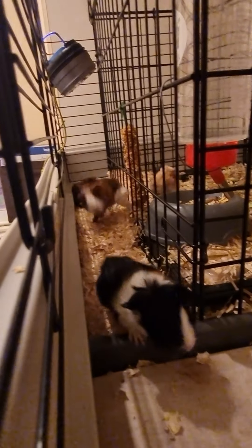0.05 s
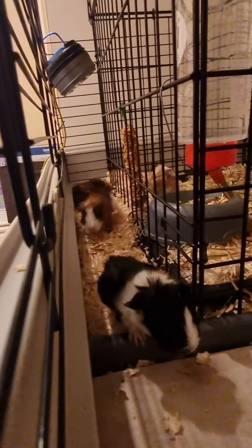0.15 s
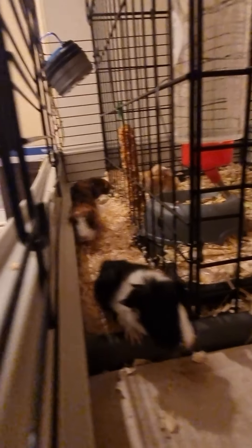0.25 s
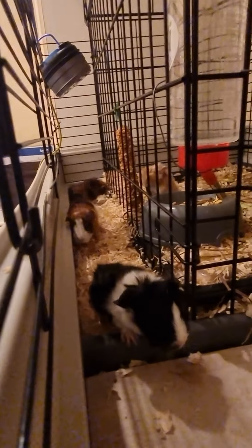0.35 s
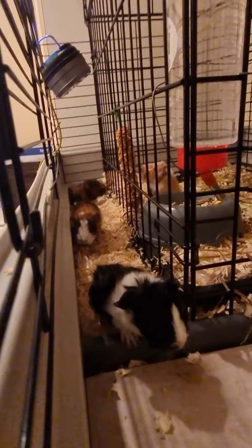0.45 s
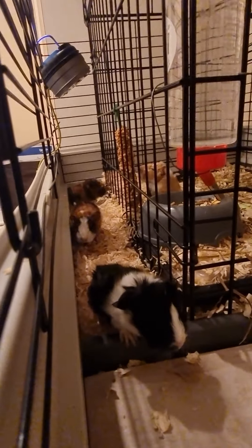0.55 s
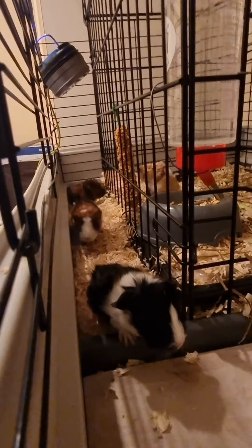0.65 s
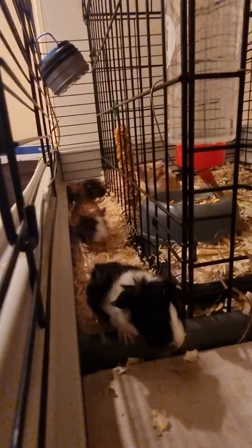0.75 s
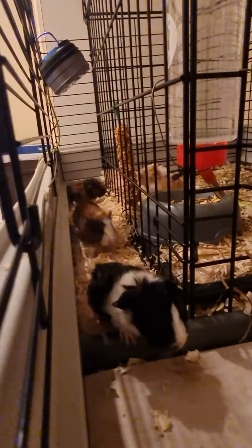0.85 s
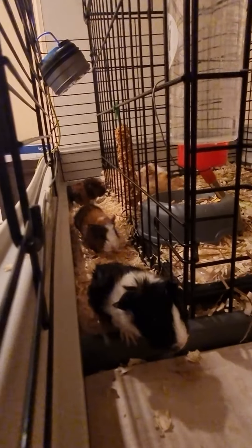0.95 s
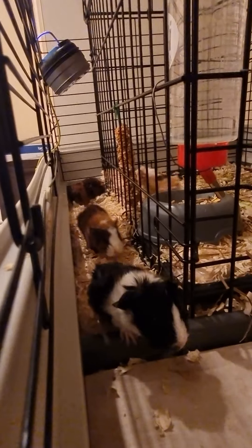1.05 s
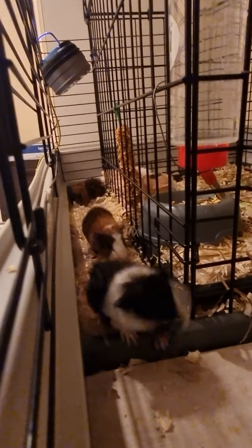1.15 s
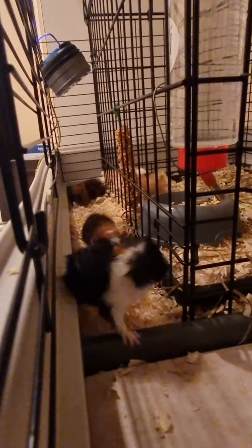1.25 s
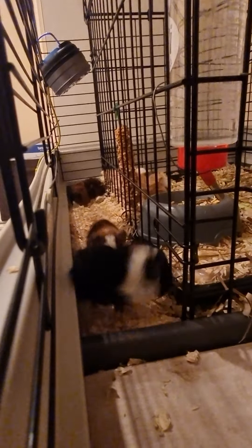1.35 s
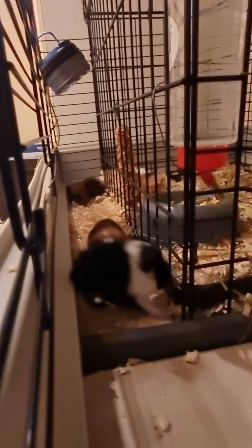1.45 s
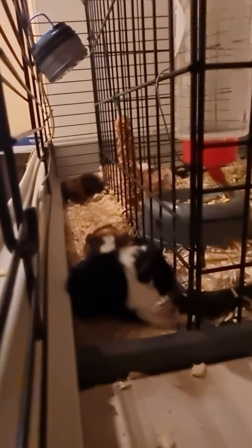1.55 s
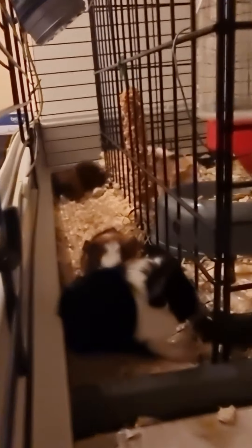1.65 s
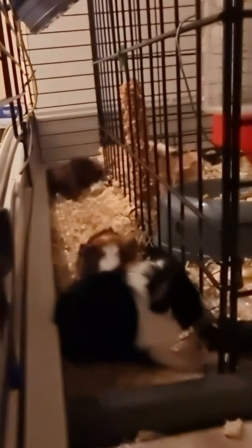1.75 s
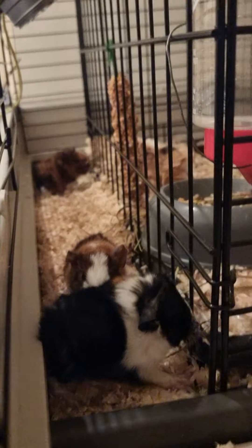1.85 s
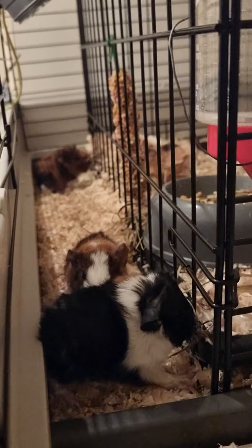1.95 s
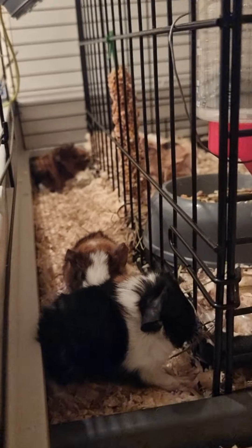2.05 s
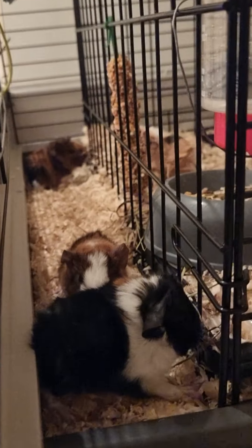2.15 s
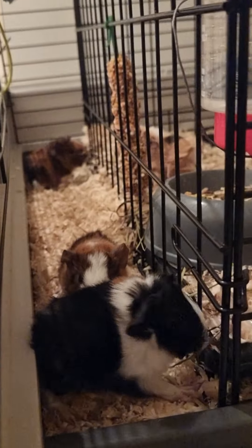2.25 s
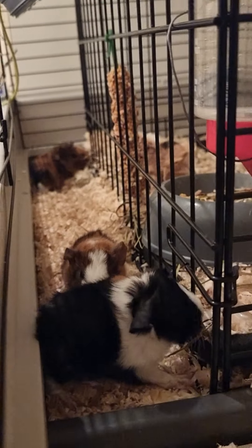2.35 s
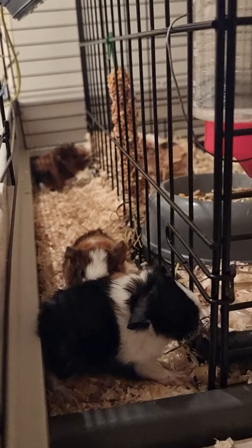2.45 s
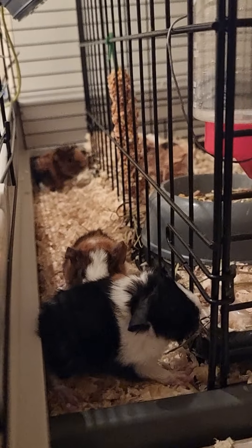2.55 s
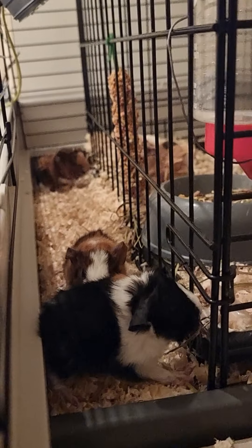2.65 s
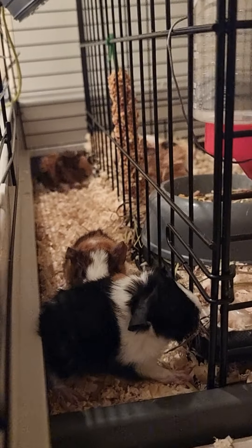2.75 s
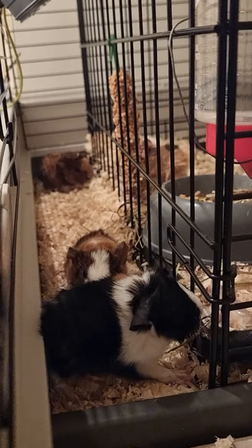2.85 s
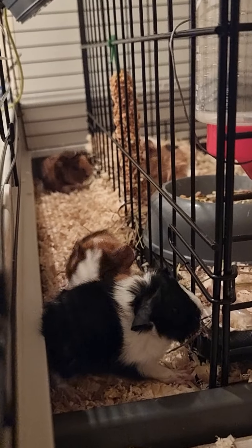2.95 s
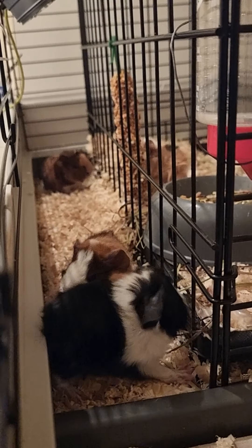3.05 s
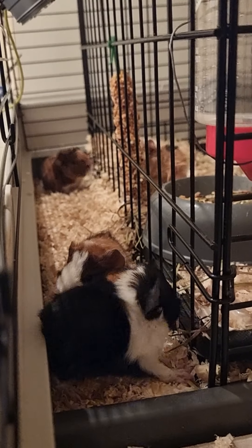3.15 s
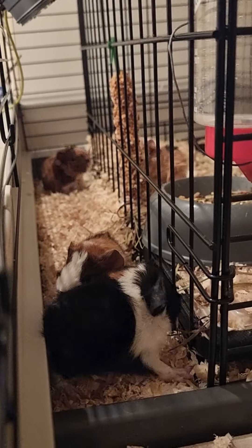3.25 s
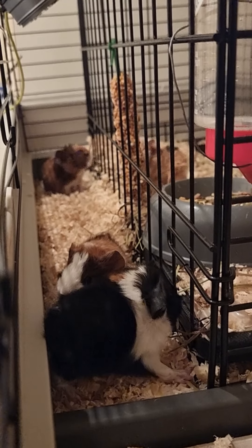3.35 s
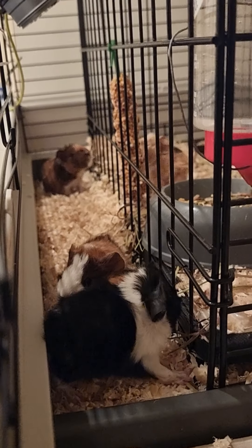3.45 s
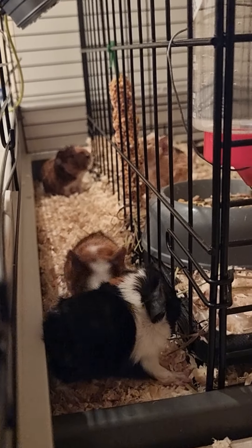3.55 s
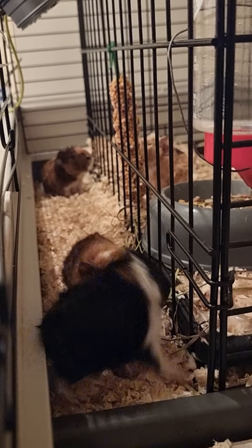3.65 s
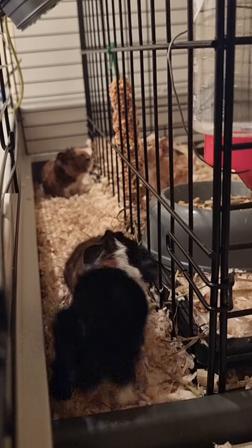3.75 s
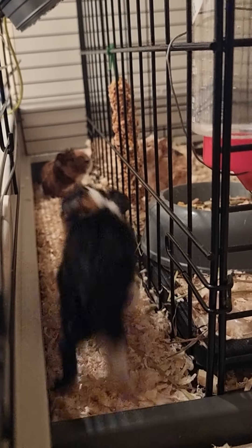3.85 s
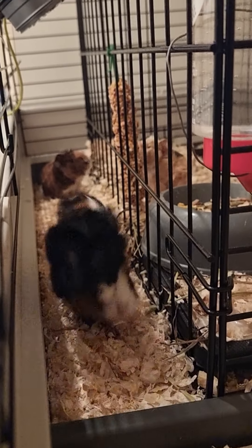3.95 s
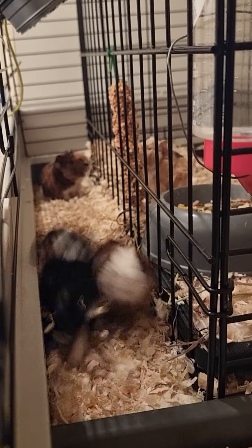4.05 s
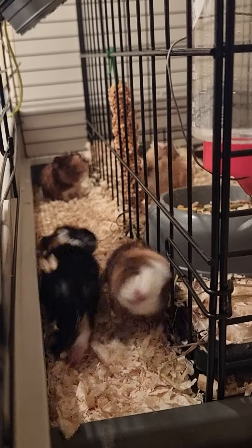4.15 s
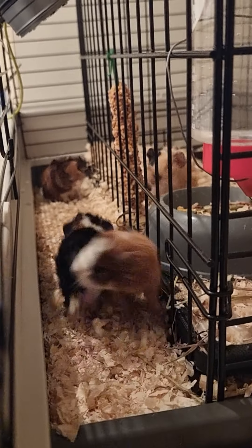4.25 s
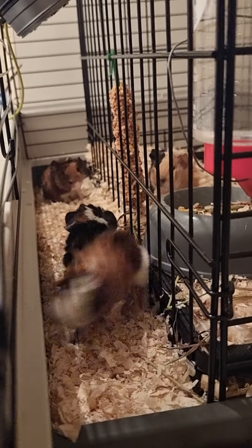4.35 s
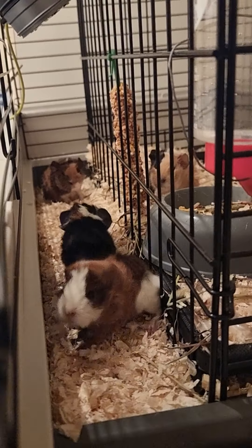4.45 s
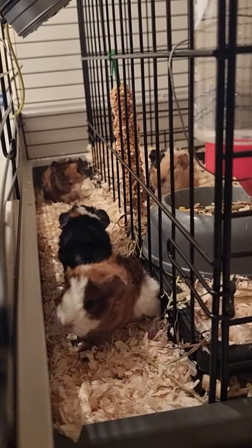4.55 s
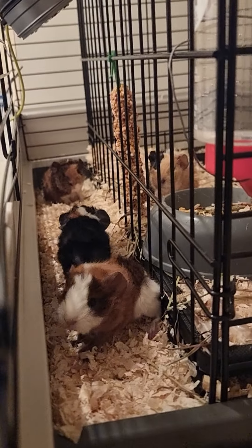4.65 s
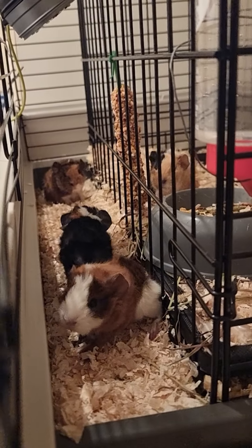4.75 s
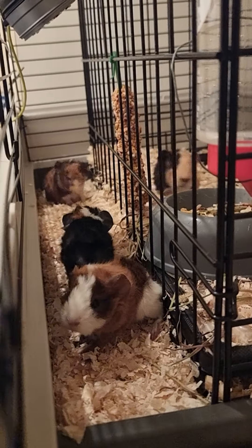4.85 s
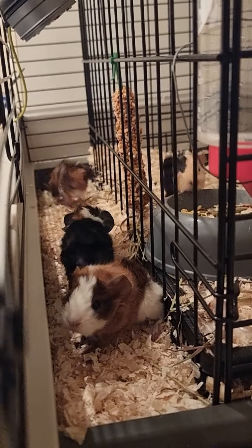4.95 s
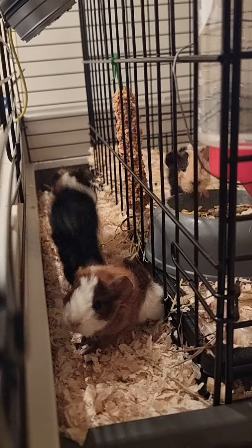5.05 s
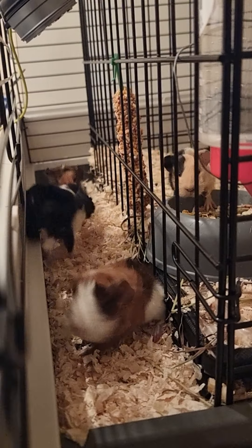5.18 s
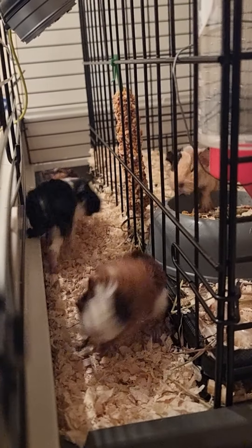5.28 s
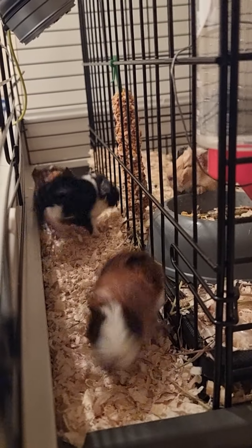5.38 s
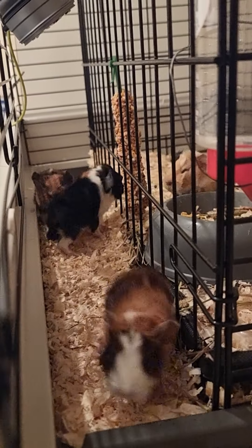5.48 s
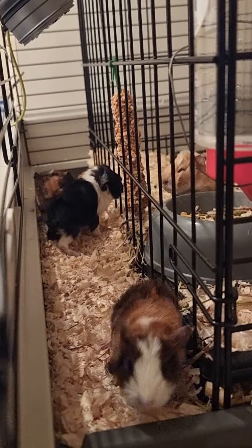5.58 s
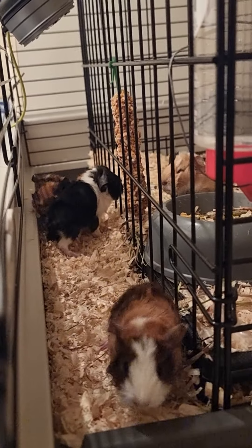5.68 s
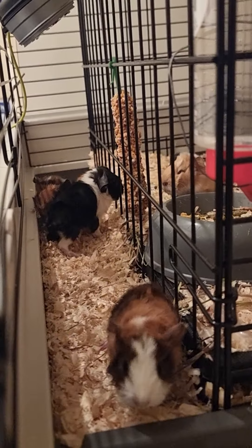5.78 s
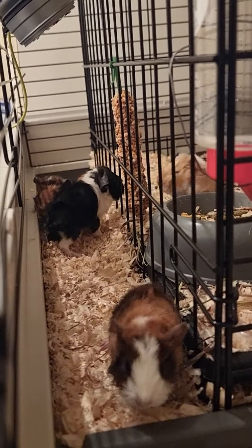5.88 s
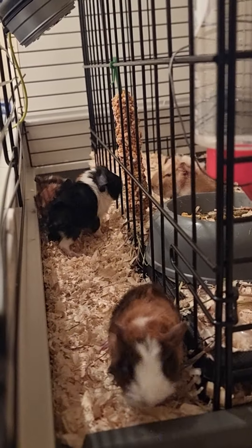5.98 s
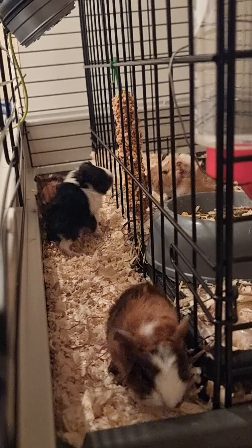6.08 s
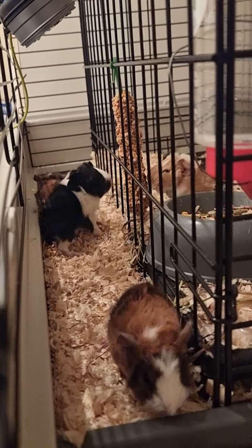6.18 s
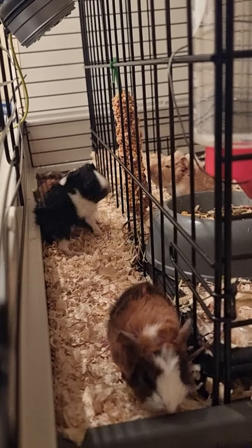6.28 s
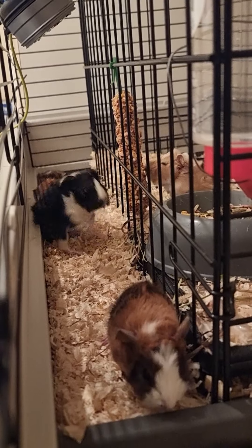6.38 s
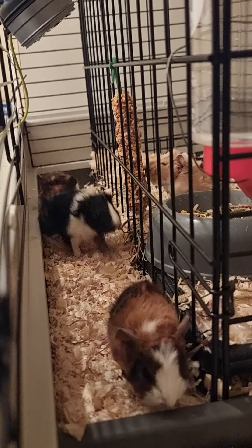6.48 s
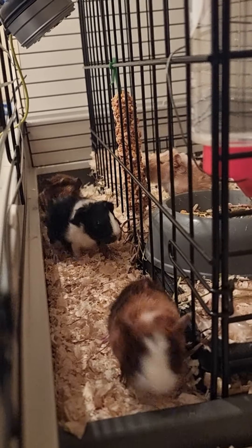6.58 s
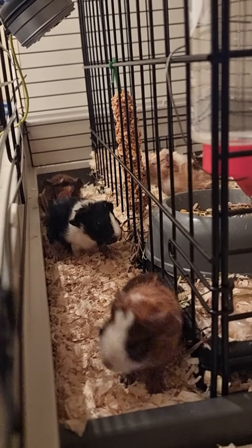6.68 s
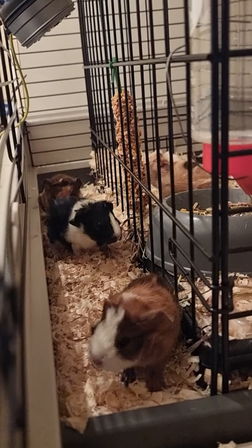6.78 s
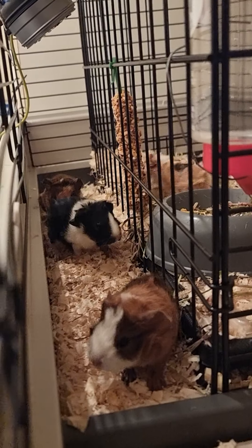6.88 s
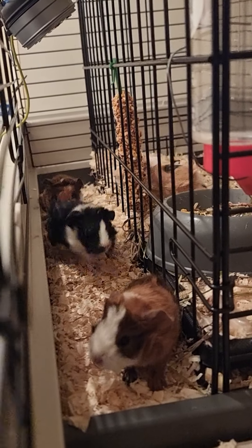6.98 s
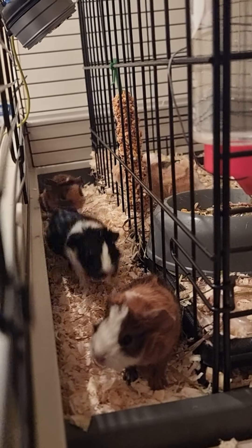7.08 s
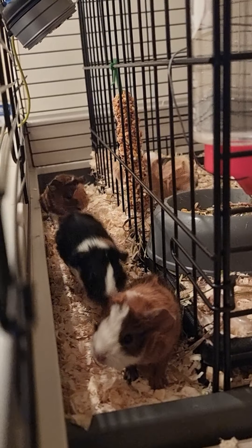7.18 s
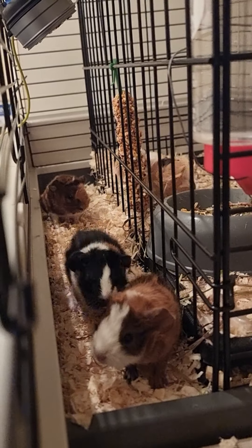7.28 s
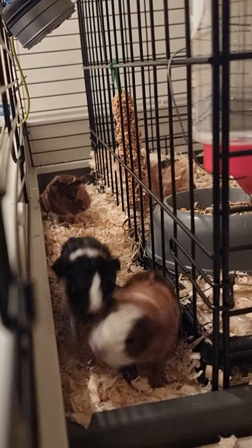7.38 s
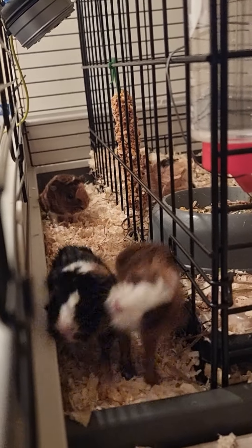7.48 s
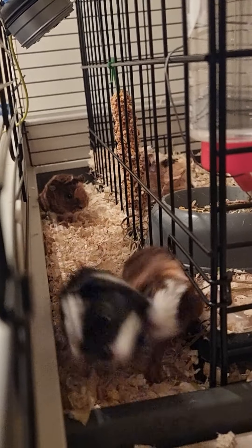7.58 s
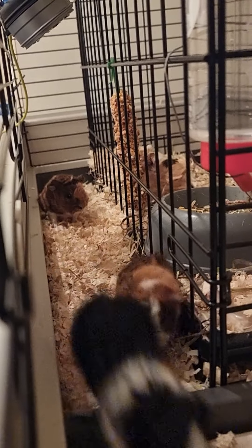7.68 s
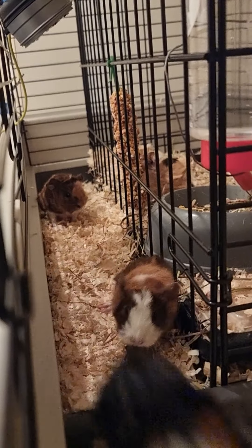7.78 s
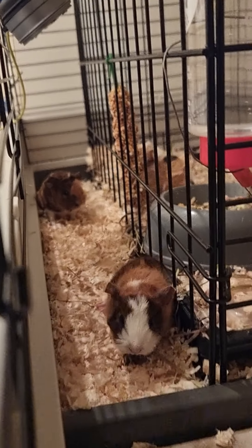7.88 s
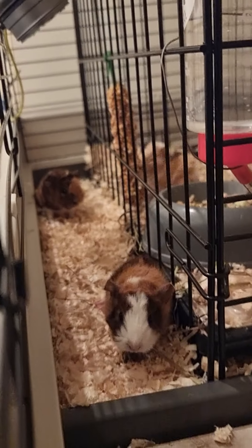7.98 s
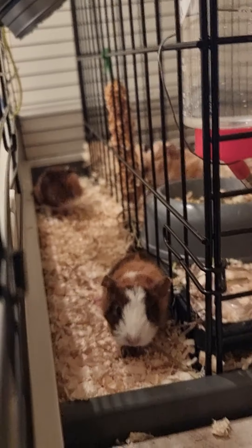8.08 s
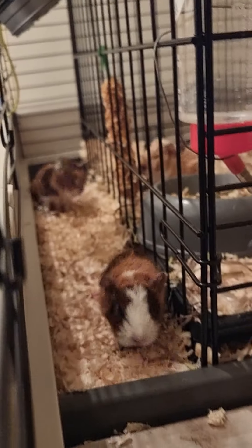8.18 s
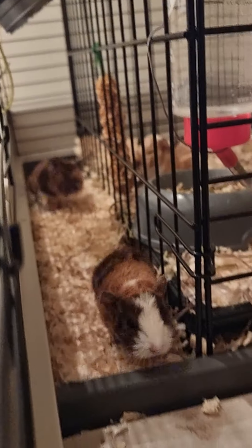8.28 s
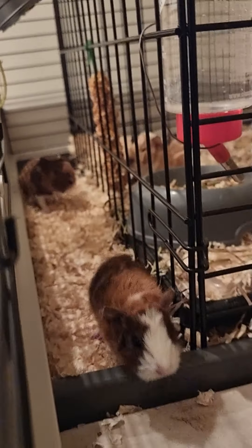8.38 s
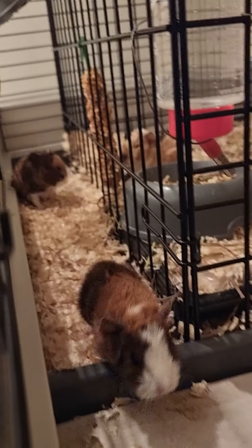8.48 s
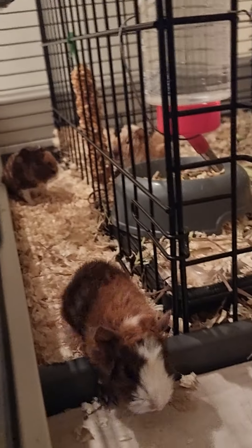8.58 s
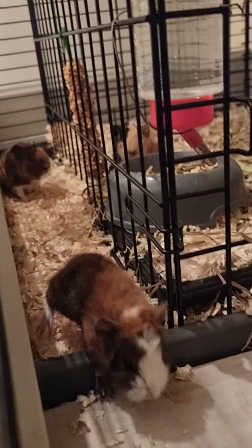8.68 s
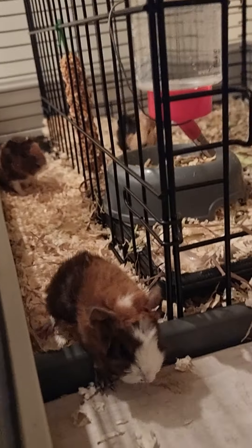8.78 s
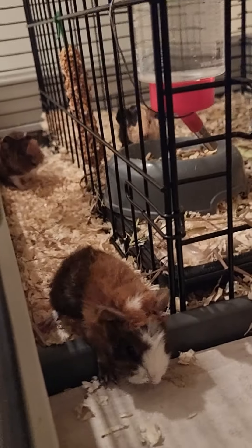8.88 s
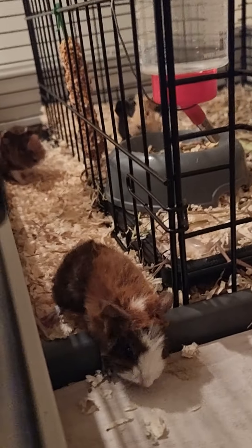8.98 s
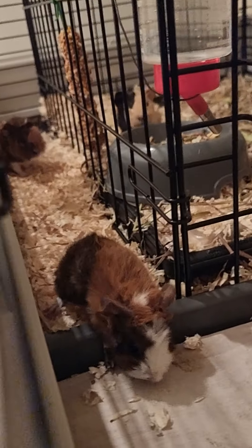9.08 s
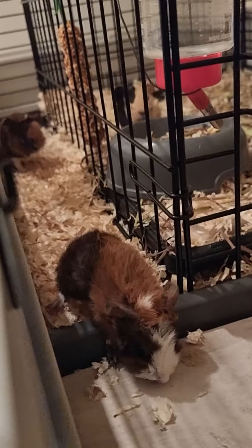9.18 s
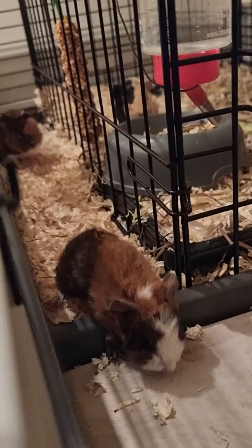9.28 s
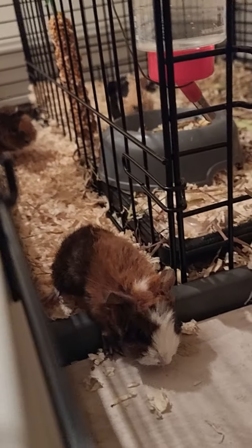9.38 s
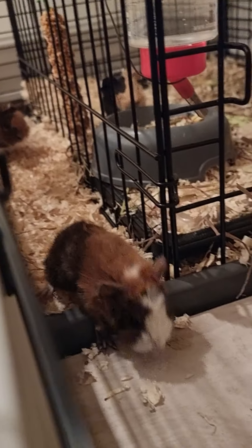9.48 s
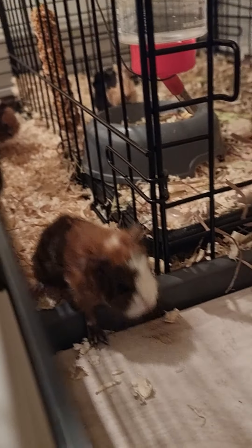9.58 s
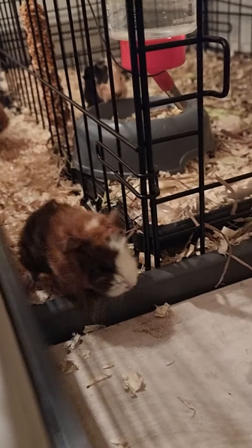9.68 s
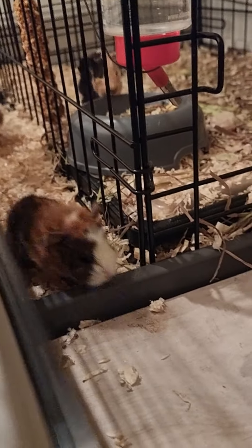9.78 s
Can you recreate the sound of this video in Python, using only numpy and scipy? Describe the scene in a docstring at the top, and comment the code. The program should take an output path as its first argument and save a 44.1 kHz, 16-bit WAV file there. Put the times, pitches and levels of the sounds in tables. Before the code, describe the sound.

Close stereo microphones catch dry wood shavings crunching under small paws, with quick throaty guinea pig chuts bubbling almost throughout. An early hard landing knocks the plastic tray, followed by a quiet pause. Two busier scuffles follow, with low hollow footfalls and sharp little clicks on wire bars, the second densest in ticks. Faint room hush and a short indoor reverberation surround everything, and it ends calmly.

```python
"""First one hears a faint room hush and the crunch of wood shavings: guinea pigs potter about a wire cage.
Shavings and hush are shaped noise; soft chuts and warbles are gliding tones with overtones, pulses and breath.
Feet set a plastic tray swinging at its low mode and tick on bars, which ring as damped modes; one body lands hard.
Two microphones close by hear it with small lags and level tilts; voices, ticks and landing excite a small room."""
import sys
import numpy as np
from scipy import signal
from scipy.fft import rfft, irfft, next_fast_len
from scipy.io import wavfile
from scipy.ndimage import uniform_filter1d, map_coordinates

SR = 44100
rng = np.random.default_rng(int(sys.argv[2]) if len(sys.argv) > 2 else 0)


def inscribe(sig):
    """Save sig as 16-bit PCM at rate SR to the path in sys.argv[1].

    A 1-D sig is mono; a 2-D sig holds one channel per row.
    Samples are clipped to [-1, 1] before scaling.
    """
    pcm = np.round(np.clip(np.atleast_2d(sig).T, -1, 1) * 32767)
    wavfile.write(sys.argv[1], SR, pcm.astype(np.int16))


N = 433503


def amp(db):
    """Decibel law: the amplitude gain of a level in dB."""
    return 10 ** (np.asarray(db) / 20)


def unit(x):
    """Normalization: x at rms 1."""
    return x / np.sqrt(np.mean(x ** 2) + 1e-20)


def along(points, hz):
    """Interpolation of (f/Hz, value) points on a logarithmic frequency axis."""
    f, v = np.transpose(points)
    return np.interp(np.log(hz + 1), np.log(f + 1), v)


def curves(rows):
    """Linear interpolation in time: one value per sample for each column after t/s."""
    s, *columns = np.transpose(rows)
    return [np.interp(np.arange(N) / SR, s, column) for column in columns]


def wobble(rate, size=N):
    """Band-limited random modulation: a smooth curve through `rate` random knots a second."""
    knots = rng.standard_normal(int(size * rate / SR) + 4)
    return map_coordinates(knots, [np.arange(size) * rate / SR])


def filtered(x, response):
    """Linear filtering: the spectrum of x times a response of frequency."""
    m = next_fast_len(N + 8192)
    return irfft(rfft(x, m) * response(np.fft.rfftfreq(m, 1 / SR)), m)[..., :N]


def bursts(peaks, levels_db, swells, fades):
    """Exponential growth and decay: summed envelopes, each rising and falling 60 dB in its swell and fade."""
    out = np.zeros(N + 3 * SR)  # starts one second early
    t = np.arange(-SR, SR) / SR
    for s, db, swell, fade in np.broadcast(peaks, levels_db, swells, fades):
        drop = np.where(t < 0, -t / max(swell, .01), t / max(fade, .03))
        out[round(s * SR):][:2 * SR] += amp(db - 60 * drop)
    return out[SR:SR + N]


# Coherence of the two microphones: f/Hz, left-right correlation [-1 to 1]
COHERENCE = [(60, 1), (150, 0.56), (300, 0.58), (700, 0.41), (1400, 0), (15000, 0)]


def grains(spectrum, spiky_db, clump_db, clump_rate, patchy_db):
    """Shot noise: stereo crackle of rms 1, in clumps of sudden onset (lulls if clump_db < 0), patchy in colour."""
    starts = (rng.random(N) < clump_rate / SR) * rng.exponential(size=N)
    clumps = unit(signal.lfilter([1], [1, -np.exp(-clump_rate / SR)], starts) - 1)
    size = amp(spiky_db * rng.standard_normal(N) + clump_db * np.clip(clumps, -2, 2.5))
    z = signal.stft(size * rng.standard_normal((2, N)), nperseg=256)[2]
    patches = uniform_filter1d(rng.standard_normal(z.shape[1:]), size=5, axis=0)  # smooth over frequency
    patches = uniform_filter1d(patches, size=7, axis=1)  # and over time
    pair = signal.istft(z * amp(patchy_db * unit(patches)), nperseg=256)[1][:, :N]

    def mid_side(hz):
        # sharing power between mid and side sets the coherence
        turn = np.arccos(np.clip(along(COHERENCE, hz), -1, 1)) / 2
        return amp(along(spectrum, hz)) * [np.cos(turn), np.sin(turn)]

    mid, side = filtered(pair, mid_side)
    return unit(np.array([mid + side, mid - side]))


def ring(modes, t, scatter_db, detune=0):
    """Modal superposition: one blow on damped modes, with random strength, phase and (if detuned) pitch."""
    out = 0
    for hz, db, t60 in modes:
        decay = amp(db + scatter_db * rng.normal() - 60 * t / t60)
        out = out + decay * np.sin(2 * np.pi * (hz * (1 + detune * rng.normal()) * t + rng.random()))
    return out


def place(out_len, events, lag_s, pan_db):
    """Interaural-style cues: each (t/s, sound) gets a random lag and level tilt between two microphones."""
    out = np.zeros((2, out_len + SR))
    for s, sound in events:
        side = rng.normal()
        for channel, sign in enumerate((1, -1)):
            lag = sign * lag_s * (1 + 0.66 * side) / 2
            start = max(round((s + lag) * SR), 0)
            gain = amp(sign * pan_db * (side + 0.48) / -2)
            out[channel, start:start + len(sound)] += gain * sound
    return out[:, :out_len]


# Spectrum of the room at rest: f/Hz, relative level/dB per Hz
HUSH = [(25, -22.5), (91, 3), (205, -18.5), (371, 4), (473, -8.5), (700, 2.5), (1390, -14.5), (2000, -28.5),
        (4000, -25.5), (7600, -22), (8400, -49), (11500, -32), (12500, -31), (15800, -35)]


def hush():
    """Stationary noise: the quiet room's own spectrum, swelling only gently."""
    return amp(-74) * grains(HUSH, spiky_db=-2.0, clump_db=1.2, clump_rate=17.0, patchy_db=2.5)


# General bustle under the single movements: t/s, fine crunch level/dB, coarse scuffle level/dB, tray level/dB
BUSTLE = [(0.0, -82, -68, -90), (0.16, -71, -72.5, -69), (0.35, -67, -65.5, -71), (0.71, -82.5, -76.5, -77),
          (1.48, -67, -67, -66), (1.69, -76, -72, -58), (2.49, -103, -84, -86.5), (2.98, -77.5, -79, -83.5),
          (3.59, -90, -82.5, -91), (4.27, -73, -79, -64), (4.44, -60, -71, -61), (4.68, -95, -92, -76),
          (4.98, -80.5, -75, -73), (5.23, -64.5, -64.5, -63), (5.47, -61.5, -66.5, -65),
          (5.75, -106, -80.5, -70.5), (6.13, -99.5, -83, -80), (7.61, -69, -73, -72.5),
          (7.83, -66, -67, -61), (7.99, -69, -68, -73), (8.24, -79, -87, -72), (8.65, -73.5, -72.5, -70.5),
          (9.11, -86, -75.5, -77), (9.83, -93, -82, -80)]
# A foot or belly shoves through the shavings:
# t/s, relative crunch level/dB, coarse and finest part over it/dB, fade t60/s
SCUFFS = [(0.0166, -44, -25, -17, 0.095), (0.107, -45.5, -27, -14, 0.24), (0.1494, -47.5, -7, -10.5, 0.13),
          (0.2309, -64.5, -3, -4, 0.4), (0.343, -50.5, -25, -8, 0.16), (0.3914, -46, -6.5, -17, 0.13),
          (0.4798, -58.5, -7, -13, 0.25), (0.5734, -63, -2, -31, 0.22), (0.8699, -63.5, -8, -9.5, 1),
          (0.998, -56, -14, -9, 0.3), (1.066, -64, -21, -16, 0.17), (1.1727, -58, -19, -12, 0.069),
          (1.32, -41, -15, -11, 0.17), (1.381, -42, 11, -32, 0.19), (1.427, -40, -11, -12.5, 0.3),
          (1.513, -42.5, -7.5, -6.5, 0.15), (1.593, -46.5, -13, -14.5, 0.16),
          (2.7247, -72, -12, -4.5, 0.95), (2.8794, -72.5, 10.5, -13, 0.22), (3.3353, -56, -19, -30, 0.14),
          (3.743, -58, -14, -12.5, 0.83), (3.812, -46, -21, -19.5, 0.096), (3.88, -40.5, -27, -10, 0.14),
          (3.927, -47, -15, -9.5, 0.15), (3.9883, -50, -41, -11.5, 0.1), (4.0462, -58, 6, -30, 0.27),
          (4.1263, -34, -26, -13.5, 0.2), (4.188, -38, -6.5, -11, 0.31), (4.241, -46, -19, -10.5, 0.23),
          (4.315, -39.5, -3, -14.5, 0.22), (4.372, -51.5, -9, -6, 0.3), (4.472, -40, -9.5, -16, 0.34),
          (4.5486, -48.5, 2, -9.5, 0.2), (4.6738, -67.5, -30, 2.5, 0.13), (4.904, -69, -2, -25, 0.19),
          (5.013, -53, -11, -8.5, 0.45), (5.086, -33.5, -5.5, -32, 0.2), (5.1294, -58, -9, -7, 0.33),
          (5.1826, -54.5, -26, -2.5, 0.23), (5.2525, -43.5, -5, -12, 0.26), (5.3607, -47, -4.5, -12, 0.38),
          (5.4198, -62, -18, -3, 0.22), (5.498, -43, -5.5, -12.5, 0.29), (5.577, -54.5, -22, -5.5, 0.35),
          (5.6294, -50.5, -25, -15.5, 0.2), (5.7877, -62.5, -4.5, -27, 0.13), (6.0292, -82, 20, -25, 0.37),
          (6.1519, -63, -20, -9.5, 0.58), (6.2706, -69, -12, -9, 0.12), (6.4388, -61.5, -12, -17, 0.35),
          (6.56, -50.5, -35, -7.5, 0.29), (6.628, -52.5, -30, -10.5, 0.33), (6.7181, -57, -15, -14.5, 0.36),
          (6.9556, -72.5, 7, -24, 0.17), (7.0165, -61.5, -15, -12, 0.73), (7.0908, -57.5, -28, -8, 0.18),
          (7.157, -50.5, -14, -9.5, 0.37), (7.305, -50.5, -25, -12, 0.15), (7.3726, -65, -2, -12, 0.28),
          (7.429, -62, -25, 6.5, 0.062), (7.5284, -56, -38, -8, 0.12), (7.6226, -48, -34, -13, 0.21),
          (7.6624, -48, -29, -10.5, 0.28), (7.74, -57.5, -2, -14.5, 0.38), (7.8216, -44, 4, -17, 0.17),
          (7.919, -37, -33, -15, 0.05), (7.9548, -63, 6, -20, 0.26), (8.046, -37, -8.5, -30, 0.2),
          (8.1534, -61, -31, -12, 0.34), (8.2237, -61.5, 10, -10, 0.24), (8.333, -70, 0.5, -15, 0.29),
          (8.409, -54.5, -5, -10.5, 0.49), (8.5185, -54, -26, -16, 0.21), (8.5914, -61, -4, -25, 0.45),
          (8.687, -47, -17, -15.5, 0.22), (8.825, -63, -8, -17, 0.94), (8.963, -51, 5, -4.5, 0.095),
          (9.3317, -66, -13, -28, 0.27), (9.4379, -66, -8, -21, 0.2), (9.7258, -71, -6, -10, 0.35),
          (9.82, -50.5, -12, -6.5, 0.26)]
# Spectrum of the fine crunch: f/Hz, relative level/dB per Hz
CRUNCH = [(1500, -28), (2800, -3.5), (4200, 0.5), (6700, 0), (8200, -5), (11500, -12), (12500, -8),
          (15800, -5)]
# Spectrum of the coarse scuffle, also of the breath: f/Hz, relative level/dB per Hz
SCUFFLE = [(500, 1), (1000, 7.5), (1400, 2.5), (2300, -1.5), (3200, -6.5), (4500, -11.5), (6000, -30)]
SPLIT_HZ, FINEST_DB = 7500, 14.5  # above the split the finest crackle has its own level
SCUFF_PEAK_S, SCUFF_SWELL_S, CREST_DB, COARSE_DB = 0.0056, 0.062, -12, 6.5  # peak delay, swell, gains


def shavings():
    """Granular friction: many tiny snaps in the shavings sum to crunch and scuffle."""
    fine_db, rough_db, _ = curves(BUSTLE)
    s, db, coarse_db, finest_db, fade = np.transpose(SCUFFS)
    peaks, db = s + SCUFF_PEAK_S, db + CREST_DB
    crunch = amp(fine_db) + bursts(peaks, db, SCUFF_SWELL_S, fade)
    finest = amp(fine_db) + bursts(peaks, db + FINEST_DB + finest_db, SCUFF_SWELL_S, fade)
    scuffle = amp(rough_db) + bursts(peaks, db + COARSE_DB + coarse_db, SCUFF_SWELL_S, fade)
    snaps = grains(CRUNCH, spiky_db=3.0, clump_db=2.0, clump_rate=170, patchy_db=1.5)
    low = filtered(snaps, lambda hz: 1 / (1 + (hz / SPLIT_HZ) ** 10))
    scuffle = scuffle * grains(SCUFFLE, spiky_db=1.5, clump_db=3.0, clump_rate=110, patchy_db=3.0)
    return crunch * low + finest * (snaps - low) + scuffle


# Footfalls on the tray: t/s, relative level/dB, boom f/Hz, thud and hollow knock over it/dB, rumble t60/s
STEPS = [(0.166, -49.5, 94.6, -36, -20, 0.35), (0.224, -62, 97, -12, 6, 0.35),
         (0.347, -48, 87.5, -37, -23, 0.54), (0.497, -47.5, 78, -32, -19, 0.35),
         (0.873, -67, 102, -19, -1, 0.53), (1.031, -51.5, 91, -27, -11, 0.38),
         (1.13, -42.5, 79, -26, -12, 0.21), (1.389, -24, 84.7, -3.5, 1.5, 0.31),
         (1.437, -32, 75.8, -29, -17, 0.16), (1.516, -36.5, 95.4, -10.5, -19, 0.29),
         (1.577, -53, 100, -5, 7.5, 0.27), (1.634, -51, 78.1, -3, -21, 0.27),
         (1.795, -39, 81, -17, -8, 0.11), (1.929, -58.5, 87, -4.5, 6.5, 0.31),
         (1.992, -52.5, 77, -16, -30, 0.19), (2.266, -60, 95, -4.5, -2, 0.39),
         (3.896, -55, 82, -13, -2.5, 0.35),  (4.185, -38, 84.3, -38, -14, 0.58),
         (4.259, -41.5, 66, -15, -20, 0.31), (4.371, -63, 95, -13, -13, 0.39),
         (4.467, -46, 81, -31, -24, 0.29), (4.543, -43.5, 101.4, -35, 1, 0.2),
         (4.649, -52, 89, -10, -4, 0.35), (4.934, -39, 95, -19, -22, 0.24),
         (5.097, -40.5, 83, -30, -22, 0.3), (5.159, -55, 75, -23, -25, 0.29),
         (5.271, -44.5, 87.4, -30, -3, 0.45), (5.325, -43.5, 85, -18, -16, 0.46),
         (5.402, -40.5, 96, -9, -3, 0.32), (5.519, -40, 81.5, -25, -10, 0.32),
         (5.568, -54, 81.5, -30, -26, 0.26), (5.834, -60.5, 88, 2.5, 1, 0.35),
         (5.989, -83, 95, -11, 11, 0.35), (6.623, -55, 104, -10, -24, 0.39),
          (7.08, -76, 131, -13, 24.5, 0.35), (7.318, -56, 94, -11, 6.5, 0.29),
         (7.658, -60.5, 88, -18, 5.5, 0.35), (7.794, -42.5, 147, 5, -10, 0.29),
         (7.828, -44.5, 133, -3, -19, 0.32), (7.9, -42, 106, -9, -4, 0.32), (7.972, -38, 62, 5, -9.5, 0.27),
         (8.04, -34.5, 73, -16, -25, 0.49), (8.1, -38.5, 62, -13, -33, 0.48),
         (8.424, -53, 77.6, -24, -6, 0.23), (8.576, -61.5, 90, -15, 15.5, 0.35),
         (8.971, -52, 82, -21, -27, 0.33), ]
# Spectrum of the tray's rumble: f/Hz, relative level/dB per Hz
TRAY = [(25, -56), (50, -4), (78, 2), (105, 2.5), (140, -13), (220, -81)]
# Spectrum of the footfalls' thud: f/Hz, relative level/dB per Hz
THUD = [(90, -32), (130, 0), (170, 3.5), (220, -6.5), (300, -45)]
# Spectrum of the hollow knocking: f/Hz, relative level/dB per Hz
HOLLOW = [(100, -34), (160, -30), (260, -3.5), (380, 1), (480, -2), (700, -46)]
STEP_PEAK_S, STEP_SWELL_S = 0.016, 0.09
RUMBLE_DB, THUD_DB, KNOCK_DB, HOLLOW_DB = -13, -6.5, -11.5, -11  # the last is bustle knocking over its rumble
THUD_T60_S, KNOCK_T60_S = 0.17, 0.26


def tray_load():
    """Forced vibration: the shifting load and footfalls make the tray rumble, thud and knock hollowly."""
    _, _, tray_db = curves(BUSTLE)
    s, db, _, thud_db, knock_db, fade = np.transpose(STEPS)
    peaks = s + STEP_PEAK_S
    rumble = amp(tray_db) + bursts(peaks, db + RUMBLE_DB, STEP_SWELL_S, fade)
    thud = bursts(peaks, db + THUD_DB + thud_db, STEP_SWELL_S, THUD_T60_S)
    hollow = amp(tray_db + HOLLOW_DB) + bursts(peaks, db + KNOCK_DB + knock_db, STEP_SWELL_S, KNOCK_T60_S)
    rumble = rumble * grains(TRAY, spiky_db=2.0, clump_db=1.5, clump_rate=15, patchy_db=3.0)
    thud = thud * grains(THUD, spiky_db=2.0, clump_db=-1.5, clump_rate=39, patchy_db=3.5)
    hollow = hollow * grains(HOLLOW, spiky_db=0.4, clump_db=1.5, clump_rate=110, patchy_db=-1.5)
    return rumble + thud + hollow


# Throat resonances: f/Hz, bandwidth/Hz, relative level/dB
THROAT = [(668, 260, 0.5), (802, 463, 3.5), (1070, 760, -4.5), (1330, 158, -14), (1790, 160, -24),
          (2307, 89, -26), (3700, 560, -12.5)]
MOUTH_HZ, MOUTH_WIDTH_HZ, MOUTH_DB = 2386, 270, 13.5  # lifts the overtone that passes through it


def chut(length, start_hz, end_hz, db, second_db, third_db, rough):
    """Source-filter voice: a gliding tone; rough ones waver and break into pulses at about half the pitch."""
    size = round((length + 0.00963) * SR)
    u = np.arange(size) / size
    pitch = (start_hz + (end_hz - start_hz) * u) * (1 + .07 * rough * wobble(90.25, size=size))
    phase = 2 * np.pi * np.cumsum(pitch) / SR

    upper = amp(second_db - 3.5) * np.sin(2 * phase)
    for k in range(3, 7):
        mouth = amp(MOUTH_DB / (1 + ((k * pitch - MOUTH_HZ) / MOUTH_WIDTH_HZ) ** 2))
        upper = upper + amp(third_db) * 0.43 ** (k - 3) * mouth * np.sin(k * phase)
    upper_db = (2.5 + 4.9 * rough) * np.minimum(wobble(146.0, size=size), 1) - 1.4 * rough
    tone = np.sin(phase) + amp(upper_db) * upper

    beats = np.cumsum(pitch / 2 * (1 + 0.18 * wobble(200, size=size))) / SR
    pulses = np.diff(np.floor(beats), prepend=0) * amp(3.2 * rng.standard_normal(size))
    t = np.arange(SR // 50) / SR
    throat = sum(amp(level) * np.exp(-np.pi * width * t) * np.sin(2 * np.pi * hz * t)
                 for hz, width, level in THROAT)
    throat = throat * (1 - np.exp(-t / 0.00092))
    small_body = signal.butter(3, (430, 4700), "band", fs=SR)  # no bass; no top treble either
    grunt = unit(signal.lfilter(*small_body, signal.fftconvolve(pulses, throat)[:size]))

    share = np.clip(0.69 * rough ** 3, 0, 1)
    attack = np.clip(u * size / (0.0058 * SR), 0, 1)
    swell = attack * np.cos(np.pi / 2 * u ** 2.02) ** 1.02  # abrupt start, rounded fall
    level = amp(db + 4.0 + 2.5 * rough * np.minimum(wobble(71.0, size=size), 1))
    return level * swell * (np.sqrt(1 - share) * tone + 0.77 * np.sqrt(share) * grunt)


# Voice syllables: nominal t/s, nominal length/s, start f/Hz, end f/Hz, relative level/dB,
# relative second-overtone level/dB, roughness [0-1.3; the tone itself uses at most 1]
CHUTS = [(0.137,0.028,1100,1138,-57,-10,0.52),(0.166,0.04,600,643,-51,-10,0.64),(0.299,0.022,637,509.6,-45.5,-9,0.81),(0.333,0.015,847,760,-53.5,-14,0.6),
         (0.365,0.032,452,625,-52.5,-5,0.56),(0.4,0.018,511,694,-51.5,-2,1.3),(0.479,0.017,680,734,-51.5,-5,0.3),(0.496,0.022,604,908,-47,-30,0.63),
         (0.518,0.063,716,704,-49.5,-25,0.28),(0.584,0.043,713,706,-55,-9,0.75),(0.709,0.035,584,647,-58,-18,0.17),(0.854,0.019,633,720,-50,-15,1.12),
         (0.882,0.015,462,773,-51,-14,0.81),(0.969,0.015,550,596,-54.5,-21,0.74),(1.006,0.02,651,849,-48.5,-14,0.74),(1.042,0.015,818,742,-52,-32,0.59),
         (1.163,0.058,689,691,-54.5,-3,1.12),(1.216,0.014,893,765,-49.5,-30,0.7),(1.334,0.017,633,540,-53.5,-23,0.65),(1.434,0.029,520,546,-45,-2,0.7),
         (1.474,0.017,504,699,-47.5,-18,0.81),(1.631,0.0073,574,623,-50,-27,0.8),(2.417,0.0051,892,1012,-51.5,-18,0.4),(2.724,0.03,563,754,-62.5,-5,0.99),
         (2.827,0.0038,683,584,-50.5,-11.5,0.08),(2.841,0.0087,726,720,-56,-22,0.3),(2.857,0.075,708,671,-58.5,-2.5,0.88),(3.027,0.019,670,724,-56.5,-27,0.4),
         (3.062,0.034,590,626,-56.5,-11,0.38),(3.087,0.015,645,820,-55,-12,0.3),(3.168,0.027,557,487,-52,-1.5,0.63),(3.185,0.013,737,800,-47.5,-16,0.32),(3.201,0.017,566,597,-46.5,-7,0.65),(3.213,0.015,778,1040,-52,-18,0.66),(3.229,0.019,693,655,-61,-14,0.86),
         (3.326,0.056,560,615,-54,-11,0.84),(3.333,0.013,965,977,-56.5,-20,0.64),
         (3.378,0.011,1020,970,-53.5,-30,0.53),(3.397,0.042,575,792,-57.5,-27,0),(3.488,0.044,677,852,-56,-19,0.43),(3.583,0.053,581,733,-54.5,-12,0.32),
         (3.662,0.017,700,900,-53.5,-38,0),(3.727,0.014,670,700,-59.5,-27,0.4),(3.859,0.034,662,713,-60,-12,0.3),(4.004,0.064,683,740,-60,2,0.14),
         (4.039,0.05,780,699,-54.5,-1,0.99),(4.083,0.0092,733,867,-50.5,-11,0.5),(4.208,0.029,830,783,-53,-16,0.28),(4.317,0.035,790,603,-54.5,-15,0.47),
         (4.362,0.022,925,973,-51,-17,0.76),(4.396,0.021,893,750,-51.5,-22,0.8),(4.458,0.013,838,760,-39,-15,0.27),(4.475,0.011,666,542,-47,-1.5,0.6),(4.494,0.016,867,760,-49.5,-21,1.1),
         (4.556,0.041,783,812,-52.5,-18,0.82),(4.591,0.053,598,594,-51.5,-11,0.86),(4.631,0.017,653,858,-46.5,-36,0.58),(4.775,0.012,540,675,-62.5,-27,0.2),(4.791,0.016,560,610,-61,-28,0.13),(4.872,0.023,640,777,-53,-19,0.1),
         (4.898,0.028,664,566,-53,-4.5,0.69),(5.002,0.048,569,697,-58,-9,0.56),(5.043,0.014,643,870,-57.5,-7,0.3),(5.091,0.016,585,622,-42.5,-1,0.48),
         (5.13,0.022,700,572,-47,-10,0.55),(5.148,0.021,588,727,-52,-10,0.34),(5.25,0.035,452,434,-53,-6,0.9),(5.294,0.015,670,737,-45.5,-6,0.53),
         (5.329,0.0066,698,780,-49.5,-7,0.87),(5.37,0.026,814,690,-49,-13,0.59),(5.39,0.033,701,634,-49.5,-2.5,0.97),(5.424,0.016,577,633,-52.5,-15,.38),(5.448,0.013,512,810,-56.5,-17,0.8),
         (5.467,0.029,530,474,-55.5,-3,0.57),(5.513,0.027,710.4,589,-46.5,-14,1.02),(5.546,0.034,456,430,-51,-13,0.9),(5.59,0.017,504,800,-52.5,-20,0.5),
         (5.658,0.015,596,720,-59,-18,0.8),(5.669,0.015,771,626,-49.5,-16,0.7),(5.679,0.018,573,592,-43,-10,0.66),(5.702,0.017,601,896,-52,-12,0.97),(5.934,0.044,707,772,-63.5,-36,0.64),(5.983,0.038,317,296,-63,-5,0.4),(5.988,0.058,685,794,-62.5,-2.5,0.62),(6.027,0.018,616,590,-52.5,-11,0.46),(6.045,.012,630,628,-56,2,1.05),
         (6.082,0.0096,854,826,-60,-11,0.55),(6.108,0.067,691,860,-56,-12,0.36),(6.178,0.032,590,519,-51,-6,0.56),(6.211,0.016,610,710,-52.5,-12,0.7),(6.243,0.037,603,615,-57,-7,0.8),
         (6.287,0.022,688,737,-56,-18,0.7),(6.357,0.033,533,640,-54,-12,0.55),(6.389,0.02,618,682,-55.5,-7.5,0.83),(6.43,0.029,552,684,-53.5,-15,0.89),(6.434,0.023,985,1060,-54.5,-14,0.2),(6.47,0.019,572,765,-47,-15,0.47),
         (6.53,0.031,655,860,-58,-9,0.7),(6.601,0.019,575,500,-52,-21,0.56),(6.606,0.015,884,797,-53.5,-10,0.6),(6.636,0.011,549,792,-45.5,-12.5,0.46),(6.739,0.024,547,708,-54,-14,0.62),
         (6.753,0.034,765,793,-56.5,-6,0.68),(6.794,0.0035,1056,1100,-59,-0.5,0.54),(6.84,.008,650,650,-63,-25,0.4),(6.856,0.03,697,658,-57.5,-29,0.69),(6.921,.008,520,557,-62,-21,0.6),(6.942,0.04,589,557,-55.5,-5.5,0.45),(6.973,0.014,903,940,-57,-18,0.4),(6.989,0.017,671,628,-56,-3.5,1.2),(7.034,0.035,618,776,-56,-9.5,0.4),(7.064,0.023,794,870,-52,-14,0.78),
         (7.104,0.02,575,867,-51.5,-31,0.72),(7.133,0.024,666,690,-58,-17,0.43),(7.152,0.035,574,620,-54,-10,0.5),(7.242,0.036,516,477,-50,-6,0.53),
         (7.278,0.017,551,752,-53,-10,0.5),(7.314,0.045,525.5,606,-52,-9,0.62),(7.438,0.034,617,621,-56,-6,1.05),(7.477,0.022,536,810,-52,-32,0.6),
         (7.506,0.049,660,720,-53.5,-34,0.6),(7.643,0.084,621,678,-51.5,-8,0.73),(7.77,0.021,636,520,-45.5,0,0.45),(7.799,0.011,627,626,-47,-23,1.1),
         (7.823,0.013,502,546,-45,-10,0.62),(7.858,0.011,485,790,-48,-11,0.67),(7.877,0.02,627,720,-54,3,1.1),(7.961,0.069,745,638,-50,-7,0.77),
         (8.037,0.025,718,734,-49.5,-2,0.91),(8.176,0.022,620,550,-58,-19,.05),(8.226,0.057,621,736,-51,-25,0.6),
         (8.384,0.024,771,721,-51,-9.5,0.94),(8.408,0.043,643,801,-55.5,-10,0.86),(8.445,0.025,910,953,-54.5,-27,0.8),(8.545,0.016,736,647,-50.5,-14,0.75),(8.574,0.0044,790,750,-57,-9,0.2),
         (8.589,0.0029,545,722,-46,-36,0.47),(8.688,0.029,642,696,-56,-22,0.26),(8.707,.012,680,682,-48.5,-21,0.52),(8.719,0.029,664,737,-53.5,-9,0.86),(8.887,0.038,562,717,-59,-25,0.8),
         (8.929,0.038,632,633,-49.5,-14,0.13),(8.956,0.0091,1135,1305,-51.5,1.5,0.72),(8.969,0.016,639,668,-53,3,0.87),(9.095,0.019,701,797,-50,-9,0.14),(9.118,0.028,543,787,-54,-10,0.67),(9.230,0.022,685,695,-52,-10,0.75),
         (9.325,0.05,622,708,-57.5,-19,0.4),(9.343,0.0031,1210,1160,-50,-34,0.15),(9.363,0.014,690,760,-53.5,-12.5,0.88),(9.488,0.06,729,802,-54.5,-14,0.22),(9.54,0.018,817,886,-65,-5,0.6),(9.696,0.034,831,771,-54.5,-3,0.33),
         (9.723,0.025,768,745,-56,-12,0.27),(9.757,0.013,482,800,-56,-6,0.9),(9.772,0.0077,860,913,-46,-5.5,0.43),(9.789,0.0064,890,885,-47.5,-12,0.5),(9.803,0.011,634,620,-49,-6,1.1)]
# third overtone: level, gain per dB of the second, gain with roughness, scatter
THIRD_DB, THIRD_PER_SECOND, THIRD_PER_ROUGH_DB, THIRD_SCATTER_DB = -23, 0.8, 4.5, 2
BREATH_DB, BREATH_PER_ROUGH_DB = -39, 9  # air noise over the syllable's table level, gain with roughness
BREATH_PEAK_S, BREATH_SWELL_S, BREATH_T60_S = 0.016, 0.051, 0.2


def voices():
    """Phonation and turbulence: all syllables, with the air that hisses through the throat."""
    s, *_, db, second_db, rough = np.transpose(CHUTS)
    third_db = (THIRD_DB + THIRD_PER_SECOND * second_db
                + THIRD_PER_ROUGH_DB * rough + THIRD_SCATTER_DB * rng.standard_normal(len(s)))
    tones = [(at - .001, chut(*rest, third, np.clip(r, 0, 1)))
             for (at, *rest, r), third in zip(CHUTS, third_db)]
    air = bursts(s + BREATH_PEAK_S, db + BREATH_DB + BREATH_PER_ROUGH_DB * rough, BREATH_SWELL_S, BREATH_T60_S)
    hiss = air * grains(SCUFFLE, spiky_db=5.0, clump_db=4.0, clump_rate=58, patchy_db=6.0)
    return place(N, tones, lag_s=0.00023, pan_db=3.0) + hiss


def steps():
    """Impulse response of a single mode: a soft paw (in STEPS) sets the tray's low mode swinging."""
    t = np.arange(SR // 3) / SR
    envelope = amp(-60 * t / 0.21) * (1 - np.exp(-t / 0.0061))
    swings = [(s, amp(db + 0.5) * envelope * np.sin(2 * np.pi * hz * t)) for s, db, hz, *_ in STEPS]
    return place(N, swings, lag_s=0.00029, pan_db=2.5)


# Claws and bodies against bars and rim:
# t/s, relative bar level/dB, relative low knock level/dB, left over right/dB
TICKS = [(0.3454,-41,-72.5,3),(1.378,-36.5,-48,0),
         (2.4178,-64,-61,-9),(3.335,-46.5,-53.5,-3),(3.881,-41.5,-51.5,-7),(4.045,-48,-78,2),
         (4.177,-41,-62,4),(4.244,-46,-70,0),(4.312,-30.5,-42,1.5),(5.072,-29.5,-70,0),(5.091,-29.5,-69,13),(5.1025,-27,-80,-11),
         (7.7939,-35.5,-36.5,-8),(7.821,-38,-60,-10),(7.844,-43,-57,3),(7.883,-30.5,-40.5,-11.5),
         (7.909,-27,-54,-5),(7.958,-37.5,-46,-7),(7.978,-31,-34.5,-7),(8.011,-39,-52,-6),
         (8.0388,-24,-57,-8.5),(8.08,-45,-57,5),(8.1302,-41.5,-48.5,-9.5),(8.154,-65,-73,0),
         (8.229,-49,-55,-10),(8.2728,-52.5,-69,-17),(8.404,-51,-77,-8),(8.425,-47,-69,-15),(8.59,-37,-71,-12),
         (8.962,-46,-52,-4)]
# Modes of the wire bars: nominal f/Hz, relative level/dB, t60/s
BARS = [(1750, 2.5, 0.025), (1917, 8, 0.024), (2366, -1, 0.031), (2873, -2.5, 0.032), (3254, -0.5, 0.025),
        (3780, -11.5, 0.031), (5070, -3, 0.025), (6160, -16, 0.0039), (7240, 0.5, 0.014)]
# Modes of the plastic rim, rung by the landing too: f/Hz, relative level/dB, t60/s
RIM = [(220.7, -18, 0.0071), (263, 0.5, 0.13), (402.4, 4.5, 0.093), (533, 1, 0.035), (645, 7, 0.048),
       (806, -4, 0.13), (1006, 1.5, 0.085), (1377, 2, 0.043)]


def ticks():
    """Impact excitation: a short scrape and crack rings the bars; heavier contact knocks the rim as well."""
    t = np.arange(SR // 4) / SR
    out = np.zeros((2, N + SR))
    for s, db, knock_db, pan_db in TICKS:
        crack = 1.95 * amp(-60 * t / 0.021) * rng.standard_normal(len(t))
        crack = signal.lfilter(*signal.butter(2, 6800, fs=SR), crack)  # blunt claws: little top treble
        bars = ring(BARS, t, scatter_db=4.5, detune=.03)  # each contact finds other bars
        metal = amp(db - 13.0) * (bars + crack) * (1 - np.exp(-t / 0.0017))
        slap = signal.lfilter([.12], [1, -.88], 6 * amp(-60 * t / 0.0079) * rng.standard_normal(len(t)))
        knock = amp(knock_db - 17.0) * (ring(RIM, t, scatter_db=1.5) + slap) * (1 - np.exp(-t / 0.0011))
        # sound reaches the right microphone 0.25 ms sooner
        out[0, round((s + .00025) * SR):][:len(t)] += amp(pan_db / 2) * (metal + knock)
        out[1, round(s * SR):][:len(t)] += amp(-pan_db / 2) * (metal + knock)
    return out[:, :N]


# Landing: relative ring level/dB, relative slap level/dB, hind end over front/dB
LANDING = (-39, -11.5, 1)
LANDING_S, HIND_S = 1.3795, .0065  # a body drops over the rim, its hind end just after
FRONT_HZ, HIND_HZ, SLAP_T60_S, SLAP_RISE_S, SLAP_LAG_S = 400, 610, .03, .0022, .00055
SMACK_DB, SMACK_HZ, SMACK_T60_S = -17.5, 2550, 0.019  # blunt crack at the head of each slap, low-passed


def landing():
    """Double impact: front and hind end each slap dully and ring the rim, differently at each microphone."""
    ring_db, slap_db, hind_db = LANDING
    t = np.arange(SR // 4) / SR
    out = np.zeros((2, N))
    for at, db, hz in ((LANDING_S, 0, FRONT_HZ), (LANDING_S + HIND_S, hind_db, HIND_HZ)):
        turns = hz * (t - [[SLAP_LAG_S], [0]]) + rng.random()  # the left wave lags in phase
        slap = amp(slap_db - 60 * t / SLAP_T60_S) * np.sin(2 * np.pi * turns)
        smack = amp(SMACK_DB - 60 * t / SMACK_T60_S) * rng.standard_normal((2, len(t)))
        smack = signal.lfilter(*signal.butter(3, SMACK_HZ, fs=SR), smack)
        body = amp(ring_db) * np.array([ring(RIM, t, scatter_db=2), ring(RIM, t, scatter_db=2)])
        hit = (body + slap + smack) * (1 - np.exp(-t / SLAP_RISE_S))
        out[:, round(at * SR):][:, :len(t)] += amp(db) * hit * amp([[-1], [1]])
    return out


# Reverberation time of the room: f/Hz, t60/s
ROOM = [(200, 0.12), (1000, 0.17), (8000, 0.14)]


def room(x):
    """Diffuse reverberation: each frequency of the walls' answer dies at its own speed."""
    hz, t, z = signal.stft(rng.standard_normal((2, SR // 2)), SR, nperseg=256)
    tail = signal.istft(z * amp(-60 * t / along(ROOM, hz)[:, None]), SR, nperseg=256)[1]
    delayed = np.pad(x, ((0, 0), (200, 0)))  # samples before the walls answer
    return signal.fftconvolve(delayed, tail / np.linalg.norm(tail[0]), axes=1)[:, :N]


def scene():
    """Superposition: animals and cage in a small quiet room."""
    bedding = (shavings() + tray_load()) * amp([[-.6], [.6]])  # a little stronger on the right
    near = voices() + ticks() + landing()
    return hush() + bedding + steps() + near + amp(-7.5) * room(near)


def record(dry):
    """Band limitation: nothing at or above 15830 Hz passes."""
    return filtered(dry, lambda hz: hz < 15830)


dry = scene()
out = record(dry)
inscribe(out)
```